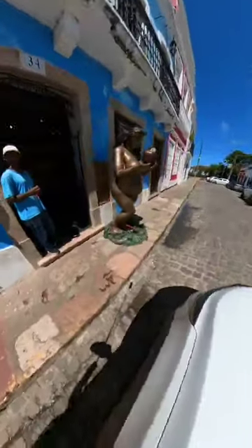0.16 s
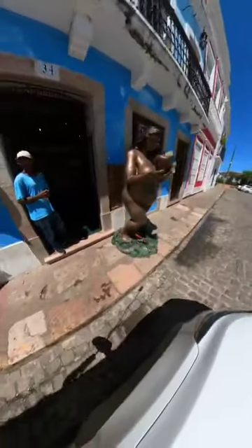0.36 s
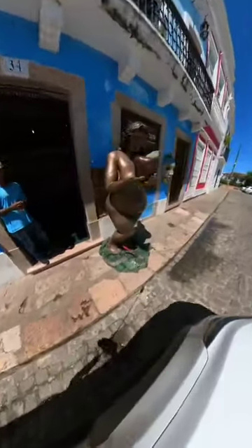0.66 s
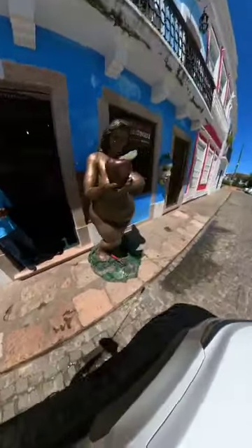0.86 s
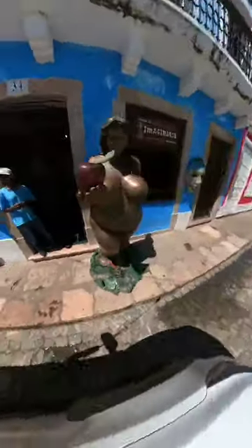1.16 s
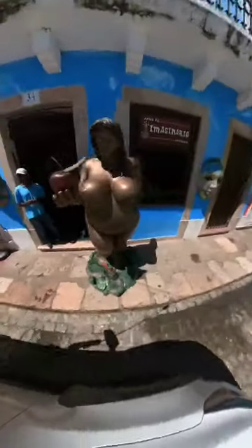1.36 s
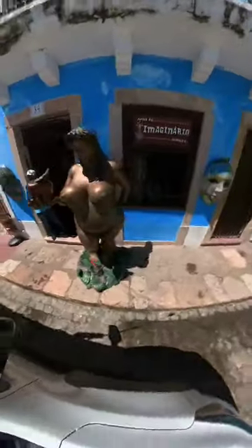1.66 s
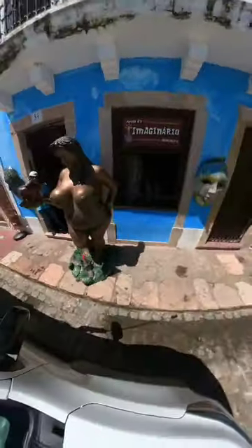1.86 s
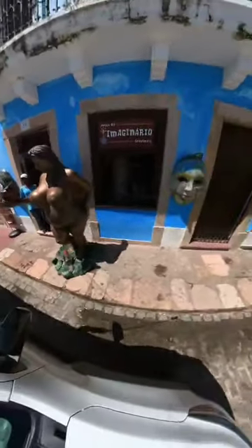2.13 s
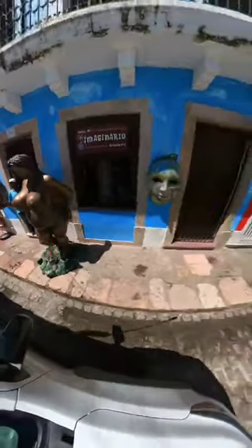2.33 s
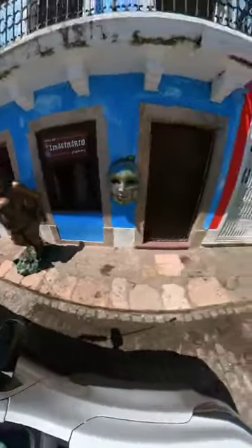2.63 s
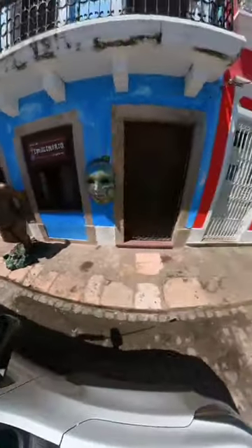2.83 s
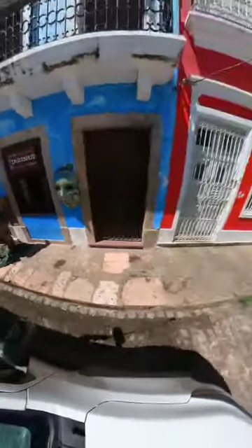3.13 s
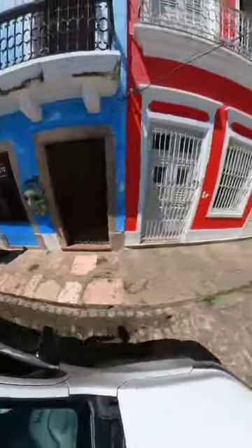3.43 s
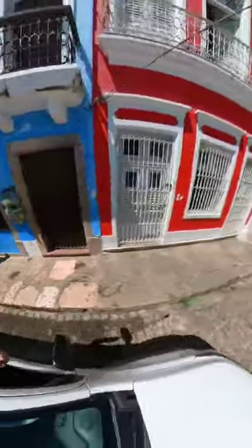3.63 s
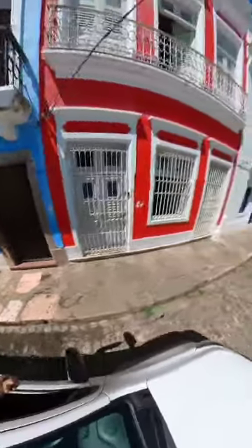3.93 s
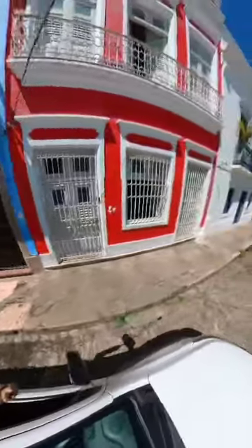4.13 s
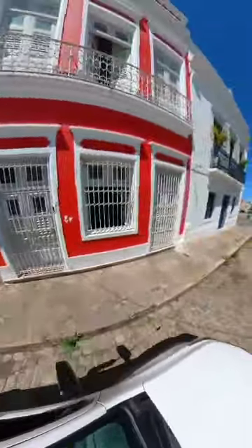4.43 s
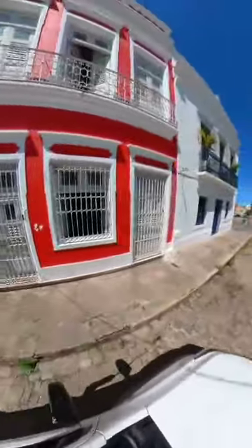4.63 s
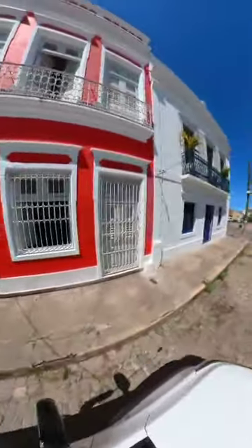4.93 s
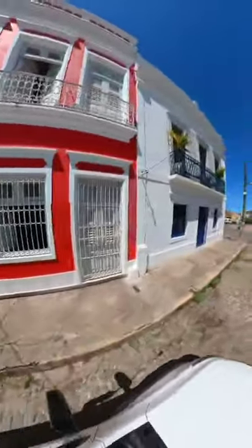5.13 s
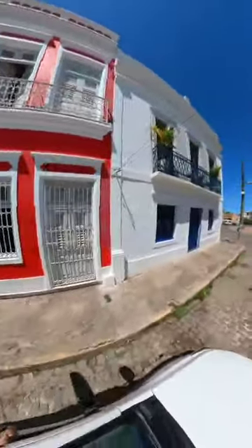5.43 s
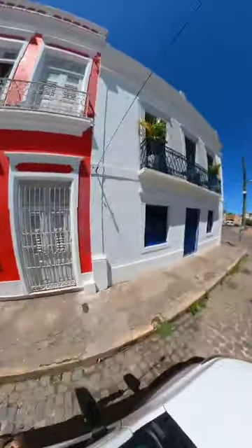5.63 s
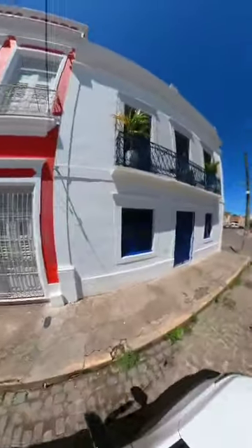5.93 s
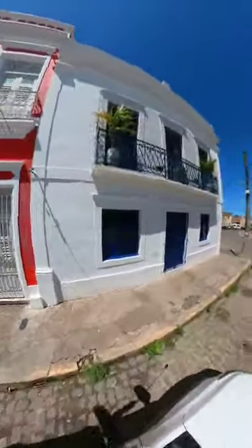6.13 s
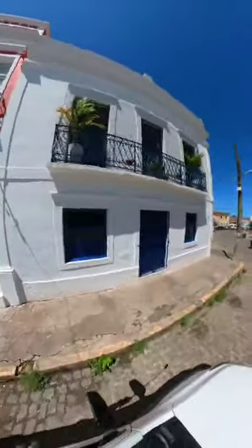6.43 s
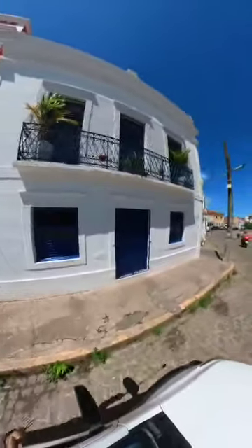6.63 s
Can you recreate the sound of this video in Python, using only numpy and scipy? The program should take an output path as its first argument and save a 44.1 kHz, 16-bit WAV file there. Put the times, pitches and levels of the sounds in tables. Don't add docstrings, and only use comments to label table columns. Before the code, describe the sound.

A small car rolls slowly over cobblestones, tyres drumming and hissing, grit ticking, low engine hum, while wind buffets and thumps the microphone increasingly.

```python
import sys
import numpy as np
from scipy import signal
from scipy.fft import rfft, irfft, next_fast_len
from scipy.io import wavfile
from scipy.ndimage import uniform_filter1d, map_coordinates

SR = 44100
rng = np.random.default_rng(int(sys.argv[2]) if len(sys.argv) > 2 else 0)


def gain_from_db(level_db):
    decades = np.asarray(level_db, float) / 20
    return 10 ** decades


def wrap_up_sound(samples):
    columns = np.atleast_2d(samples).T
    tamed = np.clip(columns, -1, 1)
    steps = np.round(tamed * 32767).astype(np.int16)
    wavfile.write(sys.argv[1], SR, steps)


N = 298998

# [t/s, level/dB]
WIND_LEVEL = [
    (0, -37.5),
    (1.2, -39),
    (2.2, -42),
    (2.9, -33),
    (3.9, -30),
    (4.6, -26),
    (5.1, -32.5),
    (5.4, -23),
    (6.05, -31.5),
    (6.78, -26),
]
# [t/s, peak level/dB]
WIND_GUSTS = [(.25, -28.5), (.85, -35), (1.3, -30), (1.66, -29.5), (1.79, -27), (2.0, -27.5), (2.2, -30),
              (2.49, -20), (2.63, -33), (2.89, -23), (2.99, -26.5), (3.21, -24), (3.4, -29), (3.56, -25),
              (3.74, -25.5), (3.92, -27.5), (4.15, -23.5), (4.3, -22), (4.66, -27.5), (4.86, -29.5),
              (4.97, -21), (5.08, -37), (5.22, -23), (5.81, -20.5), (5.93, -23.5), (6.11, -19.5),
              (6.3, -22), (6.42, -17.5), (6.59, -15.5), (6.77, -23)]
# [f/Hz, level/dB]
WIND_SPECTRUM = [(7.1, -39.5), (12, -8), (43, -1), (110, -10.5), (140, -27.5), (240, -120)]
# [t/s, peak level/dB, f/Hz]
WIND_THUDS = [(0.853, -19, 59), (1.319, -18, 78.3), (2.47, -22, 60), (2.487, -14.5, 80.2),
              (2.812, -18.5, 203), (3.763, -17.5, 179), (3.915, -17.5, 59.5), (4.055, -15.5, 103),
              (4.638, -21, 138), (5.071, -24, 91.3), (5.232, -14, 51.7), (5.325, -11.5, 90.2),
              (5.468, -14, 204), (5.505, -20, 200), (5.523, -20, 207), (5.55, -13.5, 74.6),
              (5.696, -14.5, 110), (5.703, -12.5, 137), (5.81, -13.5, 52.6), (5.922, -15, 59.7),
              (6.076, -19, 115), (6.111, -18.5, 56.5), (6.18, -14.5, 110), (6.23, -15.5, 100),
              (6.421, -13.5, 77.8), (6.564, -13.5, 78), (6.593, -15, 72.2), (6.65, -17, 110)]
# [t/s, peak level/dB, f/Hz]
COBBLE_KNOCKS = [(0.245, -23.5, 273), (0.851, -27, 360), (1.024, -21.5, 270), (2.377, -25, 360),
                 (2.412, -24.5, 267), (2.552, -32.5, 416), (2.852, -23, 362), (2.911, -25.5, 360),
                 (3.425, -21, 313), (3.55, -20, 238), (3.697, -17, 238), (4.034, -18.5, 313),
                 (4.298, -28, 269), (4.887, -25, 315), (4.932, -21.5, 273), (5.059, -17.5, 260),
                 (5.223, -19, 313), (5.277, -24, 330), (5.433, -20.5, 414), (5.444, -21.5, 414),
                 (5.752, -17, 360), (5.882, -24, 357), (6.037, -35, 411), (6.079, -26.5, 410),
                 (6.104, -24, 360), (6.359, -24, 303), (6.531, -18.5, 360)]
# [t/s, peak level/dB]
WHEEL_DROPS = [
    (2.499, -13),
    (4.2758, -10),
    (4.631, -9),
    (5.0749, -9),
]
# [t/s, level/dB]
TREAD_LEVEL = [(0, -52), (.1, -49.5), (.4, -51), (1.3, -48), (2.3, -46), (2.7, -43), (3.1, -43.5),
               (3.6, -45), (4.1, -44.5), (4.5, -45), (5.0, -46), (5.4, -50), (5.65, -48), (5.87, -49.5),
               (6.02, -45), (6.45, -47.5), (6.78, -52)]
# [f/Hz, level/dB]
DRUM_SPECTRUM = [(32, -29.5), (55, -7), (114, 2), (251, -9.5), (285, -17), (400, -23), (520, -33),
                 (880, -120)]
# [f/Hz, level/dB]
ROAR_SPECTRUM = [(140, -22.5), (230, -4.5), (287, -4), (567, -4.5), (752, -8.5), (990, -14.5),
                 (1500, -25.5), (1950, -49), (3300, -120)]
# [f/Hz, level/dB]
HISS_SPECTRUM = [(590, -32), (1000, -2), (1630, -9.5), (1850, -8.5), (2400, -27), (3120, -50), (5280, -120)]
# [f/Hz, level/dB]
SIZZLE_SPECTRUM = [(1240, -27.5), (2100, -4.5), (2390, -5), (2740, -2.5), (3250, -9), (3560, -9),
                   (4370, -25.5), (5200, -28.5), (6760, -59.5), (11400, -120)]
# [t/s, level/dB]
SAND_LEVEL = [(0, -70), (.55, -69), (1.3, -64.5), (1.5, -61), (2.0, -62), (2.9, -62), (3.9, -59.5),
              (4.6, -60.5), (5.0, -63), (5.15, -64.5), (5.5, -69), (5.62, -64), (5.8, -65.5), (6.15, -64),
              (6.55, -65.5), (6.65, -70), (6.78, -66.5)]
# [t/s, peak level/dB]
SAND_SPRAYS = [
    (1.34, -57),
    (1.89, -57.5),
    (1.98, -53.5),
    (2.62, -61.5),
    (3.1, -60),
    (3.2, -59.5),
    (3.47, -56),
    (3.93, -60),
    (4.78, -58.5),
]
# [t/s, peak level/dB, f/Hz]
FLUNG_GRIT = [(1.333, -43, 6730), (1.4688, -42.5, 6580), (1.5565, -46, 6970), (1.6025, -44.5, 7660),
              (1.737, -47, 6940), (1.951, -45, 6830), (1.9685, -46, 7130), (2.112, -44.5, 7000),
              (2.3883, -47.5, 6740), (2.56, -47, 7110), (2.8935, -44, 8170), (3.1947, -40.5, 6700),
              (3.3576, -41, 6730), (3.4436, -42.5, 7400), (3.497, -42, 7280), (3.698, -45, 7600),
              (3.7338, -42, 7960), (3.86, -43.5, 7330), (3.905, -41.5, 7180), (3.924, -35, 7180),
              (3.942, -41.5, 7500), (3.9942, -44, 7540), (4.0318, -41.5, 7740), (4.1076, -44, 7400),
              (4.153, -39, 7150), (4.2043, -40, 7220), (4.4673, -44.5, 7280), (4.58, -44, 7160),
              (4.7832, -45.5, 7200), (4.9482, -44, 6570)]
# [f/Hz, level/dB]
PORT_SPECTRUM = [(4000, -68), (4800, -26), (5240, -14.5), (5900, -6), (6580, 1.5), (7330, 1), (8000, -8.5)]
# [t/s, firing f/Hz, 1st order level/dB, 8th order level/dB]
ENGINE_RUN = [(0, 26.49, -36.5, -40), (1, 26.98, -36.5, -39), (2, 27.16, -39.5, -43.5),
              (2.4, 28.68, -35, -36.5), (3, 31.47, -40.5, -37.5), (3.4, 31.11, -37, -38),
              (4.2, 31.6, -40, -42), (4.8, 32.38, -33.5, -41), (5.5, 33, -35.5, -42.5),
              (6.2, 32.6, -40, -39.5), (6.78, 32.06, -52.5, -48)]
# [t/s, f/Hz, level/dB]
PANEL_HUM = [(0, 103, -39), (.5, 102, -33), (.75, 104, -38), (1.2, 105, -35), (1.35, 106, -42),
             (1.47, 108, -30), (2.2, 108.5, -31), (2.4, 108, -41), (2.62, 109, -36), (2.77, 110, -28.5),
             (2.95, 113, -37), (3.2, 113, -60)]
# [t/s, f/Hz, level/dB]
CAVITY_RING = [
    (0, 924, -51),
    (1.5, 942.4, -47),
    (2.5, 958, -42.5),
    (3.2, 990, -41),
    (3.8, 1093, -45),
    (5, 1137, -48.5),
    (5.4, 1099, -63.5),
    (6.78, 1054, -73),
]
# [t/s, depth/dB]
GAIN_DIPS = [(1.92, 0.5), (2.52, -2), (3.43, 1.5), (4.645, 1), (4.84, -2.5), (5.045, 10), (5.085, 5.5),
             (5.22, 5), (5.31, 5.5), (5.43, 2), (5.5, 3.5), (5.708, 2.5), (5.79, 2), (6.11, 1), (6.5, 2.5),
             (6.6, 4.5)]
# [f/Hz, level/dB]
RESAMPLER_RESPONSE = [(7000, -0.5), (8000, 3), (8600, -12.5), (9200, -28.5), (9800, -50.5), (11000, -90)]

GUST_HALF_S, JOLT_HALF_S, SPRAY_HALF_S = 0.037, 0.022, 0.0041
THUD_HALF_CYCLES, KNOCK_HALF_CYCLES = 0.64, 0.76
BUMP_START_HZ, BUMP_END_HZ, BUMP_SAG_S, BUMP_T60_S, BUMP_SOFT_S = 307, 60, 0.0027, 0.13, 0.0014
DRUM_DB, DRUM_DB_PER_HZ = -31, 0.63
JOLT_DB, JOLT_MIN_HZ = -10.5, 85
ROAD_REF_DB, ROAR_DB, SIZZLE_DB = -45, -35, -59
ROAR_DB_PER_DB, SIZZLE_DB_PER_DB, SIZZLE_DB_PER_SAND_DB = 0.42, 0.51, 0.15
TICK_SHARE = 0.3
DUCK_ATTACK_S, DUCK_RELEASE_S = 0.02, 0.05
DUCK_BASS, DUCK_ROAR = 0.4, 0.91


def wind():
    flutter = coloured(rng.standard_normal(N), WIND_SPECTRUM)
    level_db = curves(WIND_LEVEL)[0]
    return swells(level_db, WIND_GUSTS, GUST_HALF_S) * even(flutter, seconds=0.36)


def pops():
    out, left = np.zeros(N + SR), np.ones(N + SR)
    events = [(*k, KNOCK_HALF_CYCLES) for k in COBBLE_KNOCKS]
    events += [(*k, THUD_HALF_CYCLES) for k in WIND_THUDS]
    for s, db, hz, cycles in events:
        half = int(3 * cycles / hz * SR)
        start = round(s * SR) - half
        u = np.arange(-half, half) / SR * hz
        shape = np.exp(-(u / cycles) ** 2)
        out[start:][:len(u)] += gain_from_db(db) * shape * np.cos(2 * np.pi * u + 0.8)
        masking = np.clip(0.73 * gain_from_db(0.65 * (db + 11.5)), 0, 0.9)
        left[start:][:len(u)] *= 1 - masking * shape ** 0.4
    return out[:N], left[:N]


def bumps():
    out, t = np.zeros(N + SR), np.arange(SR // 8) / SR
    sag = BUMP_SAG_S * (1 - np.exp(-t / BUMP_SAG_S))
    turns = BUMP_END_HZ * t + (BUMP_START_HZ - BUMP_END_HZ) * sag
    for s, db in WHEEL_DROPS:
        out[round(s * SR):][:len(t)] += gain_from_db(db - 60 * t / BUMP_T60_S) * np.sin(2 * np.pi * turns)
    size = round(BUMP_SOFT_S * SR)
    out = np.convolve(out, np.hanning(size) * 2 / size, "same")
    t = np.arange(N) / SR
    left = np.prod([1 - 0.75 * np.exp(-((t - s - 0.01) / 0.035) ** 2) for s, db in WHEEL_DROPS], axis=0)
    return out[:N], left


def tyres(left, stones, duck):
    speed_hz, hiss_db = curves(ENGINE_RUN)[0], curves(TREAD_LEVEL)[0]
    jolts = [(s, db + JOLT_DB) for s, db, hz in COBBLE_KNOCKS + WIND_THUDS if hz > JOLT_MIN_HZ]
    jolts += [(s, db + JOLT_DB) for s, db in WHEEL_DROPS]
    drumming = swells(DRUM_DB + DRUM_DB_PER_HZ * (speed_hz - speed_hz[0]), jolts, JOLT_HALF_S)
    drum = coloured(mixed(impacts(rate=70, spread_db=0), share=0.14), DRUM_SPECTRUM)
    drum = drumming * even(drum, seconds=0.06)

    roar = coloured(mixed(impacts(rate=300, spread_db=3.5), share=0.053), ROAR_SPECTRUM)
    roar = even(streaky(roar, depth_db=2.5), seconds=0.033)
    roar_db = ROAR_DB + ROAR_DB_PER_DB * (hiss_db - ROAD_REF_DB)
    roar = gain_from_db(roar_db + 0.093 * stones) * roar

    tread = streaky(mixed(impacts(rate=1100, spread_db=2.5), share=0.052), depth_db=1.5)
    hiss = gain_from_db(hiss_db + 0.82 * stones) * even(coloured(tread, HISS_SPECTRUM), seconds=0.068)
    sizzle_db = SIZZLE_DB + SIZZLE_DB_PER_DB * (hiss_db - ROAD_REF_DB)
    sizzle_db = sizzle_db + SIZZLE_DB_PER_SAND_DB * (curves(SAND_LEVEL)[0] + 62.5)
    sizzle = gain_from_db(sizzle_db + 0.62 * stones) * coloured(tread, SIZZLE_SPECTRUM)
    return left * duck ** DUCK_BASS * drum + duck ** DUCK_ROAR * roar + duck * (hiss + sizzle)


def grit(stones):
    clumps = gain_from_db(1.5 * wobble(45) + 0.46 * wobble(13))
    pings = unit(clumps * grains(count=7000, centre_hz=7280, scatter=0.09, cycles=5.0, spread_db=1.0))
    noise = coloured(rng.standard_normal(N), PORT_SPECTRUM)
    bed = np.sqrt(TICK_SHARE) * pings + np.sqrt(1 - TICK_SHARE) * noise
    level = swells(curves(SAND_LEVEL)[0], SAND_SPRAYS, SPRAY_HALF_S)
    out, t = np.zeros(N + SR), np.arange(SR // 200) / SR
    out[:N] = level * gain_from_db(2.56 + 0.5 * stones + 0.86 * wobble(30)) * bed
    first = np.exp(-((t - 0.001) / 0.00052) ** 2)
    bounce = 0.53 * np.exp(-((t - 0.0029) / 0.00045) ** 2)
    for s, db, hz in FLUNG_GRIT:
        out[round(s * SR):][:len(t)] += gain_from_db(db - 4.5) * (first + bounce) * np.sin(2 * np.pi * hz * t)
    return out[:N]


def engine():
    hz, first_db, eighth_db = curves(ENGINE_RUN)
    turn = 2 * np.pi * np.cumsum(hz * (1 + 0.0016 * wobble(6))) / SR
    order_db = {1: first_db, 2: first_db + 0.96, 6: first_db - 9.5, 8: eighth_db - 5.5, 12: eighth_db - 11.5}
    firing = sum(gain_from_db(db + wobble(7)) * np.sin(k * turn) for k, db in order_db.items())
    panel_hz, panel_db = curves(PANEL_HUM)
    panel_turn = 2 * np.pi * np.cumsum(panel_hz + 0.36 * wobble(5)) / SR
    panel = gain_from_db(panel_db + 0.6 * wobble(10)) * np.sin(panel_turn)
    return np.sqrt(2) * (firing + panel)


def cavity_ring():
    hz, level_db = curves(CAVITY_RING)
    turn = 2 * np.pi * np.cumsum(hz) / SR
    return gain_from_db(level_db) * (wobble(220) * np.sin(turn) + wobble(120) * np.sin(turn / 2))


def ducking():
    dip_db = np.zeros(N)
    for s, db in GAIN_DIPS:
        u = np.maximum(np.arange(N) / SR - s, 0)
        dip_db += 1.45 * db * (1 - np.exp(-u / DUCK_ATTACK_S)) * np.exp(-u / DUCK_RELEASE_S)
    return gain_from_db(-dip_db)


def impacts(rate, spread_db):
    draw = rng.random((N, 3))
    size = gain_from_db(-spread_db * np.log(draw[:, 1] + 1e-4))
    return unit((draw[:, 0] < rate / SR) * size * np.sign(draw[:, 2] - 0.5))


def mixed(knocks, share):
    return np.sqrt(share) * knocks + np.sqrt(1 - share) * rng.standard_normal(N)


def grains(count, centre_hz, scatter, cycles, spread_db):
    draw, k = rng.random((count, 2)), np.arange(96)
    hz = centre_hz * np.exp(scatter * np.clip(rng.standard_normal((count, 1)), -2, 2))
    u = (k - 48) / SR * hz
    level = gain_from_db(-spread_db * np.log(draw[:, 1:] + 0.01))
    pings = level * np.exp(-(u / cycles) ** 2) * np.sin(2 * np.pi * u)
    places = (draw[:, :1] * N).astype(int) + k
    return unit(np.bincount(places.ravel(), pings.ravel(), N + 96)[:N])


def streaky(x, depth_db):
    z = signal.stft(x, nperseg=2048)[2]
    field = uniform_filter1d(rng.standard_normal(z.shape), size=2, axis=0)
    field = uniform_filter1d(field, size=14, axis=1)
    return unit(signal.istft(z * gain_from_db(depth_db * unit(field)), nperseg=2048)[1][:N])


def swells(steady_db, rows, half_s):
    t = np.arange(N) / SR
    power = sum(gain_from_db(db) ** 2 * np.exp(-((t - s) / half_s) ** 2) for s, db in rows)
    return np.sqrt(gain_from_db(steady_db) ** 2 + power)


def coloured(x, spectrum):
    m = next_fast_len(N + 8192)
    hz, db = np.transpose(spectrum)
    gain = gain_from_db(np.interp(np.log(np.fft.rfftfreq(m, 1 / SR) + 1), np.log(hz + 1), db))
    return unit(irfft(rfft(x, m) * gain, m)[:N])


def even(x, seconds):
    size = int(seconds * SR)
    power = uniform_filter1d(uniform_filter1d(x * x, size), size)
    return unit(x / np.sqrt(np.abs(power) + 0.055))


def wobble(rate):
    knots = rng.standard_normal(int(N * rate / SR) + 4)
    return map_coordinates(knots, [np.arange(N) * rate / SR])


def curves(rows):
    s, *cols = np.transpose(rows)
    return [np.interp(np.arange(N) / SR, s, c) for c in cols]


def unit(x):
    return x / np.sqrt(np.mean(x ** 2) + 1e-20)


def scene():
    (knocks, left), (thumps, spared) = pops(), bumps()
    left = left * spared
    stones = wobble(20)
    duck = ducking()
    low = knocks + thumps + left * duck ** DUCK_BASS * wind()
    road = tyres(left, stones, duck) + duck * grit(stones)
    drive = duck ** DUCK_ROAR * (engine() + cavity_ring())
    return (low + road + drive)[None]


def band_limit(x):
    return signal.sosfilt(signal.butter(12, 9410, fs=SR, output="sos"), x)


def record(dry):
    held = dry / (1 + np.abs(dry / 0.45) ** 4) ** (1 / 4)
    m = 441 * 720
    fold = m * 8000 // SR
    z = rfft(held, m)
    z[:, fold + 1:2 * fold + 1] = np.conj(z[:, fold - 1::-1])
    z[:, 2 * fold:] = 0
    hz, db = np.transpose(RESAMPLER_RESPONSE)
    gain = gain_from_db(np.interp(np.fft.rfftfreq(m, 1 / SR), hz, db))
    raised = irfft(z * gain, m)[:, :N]
    return band_limit(raised)


dry = scene()
out = record(dry)
wrap_up_sound(out)
```